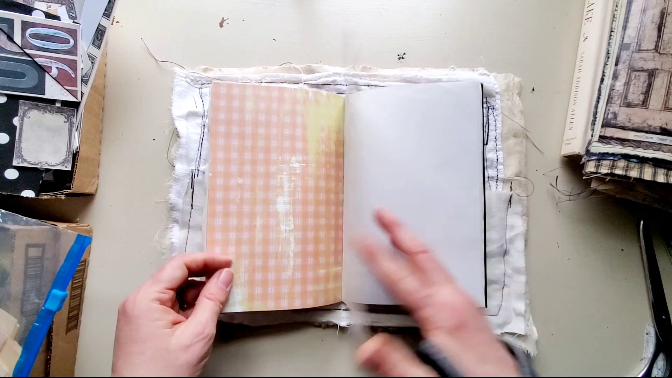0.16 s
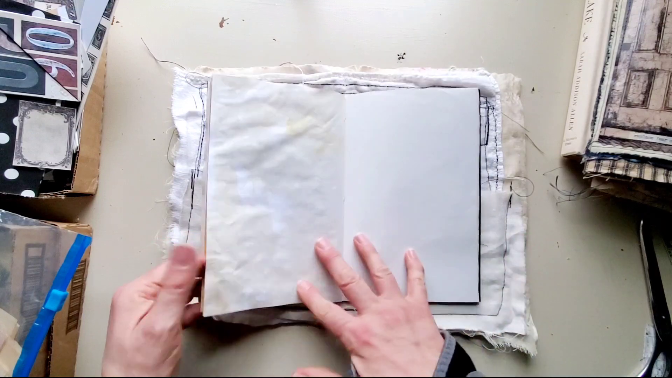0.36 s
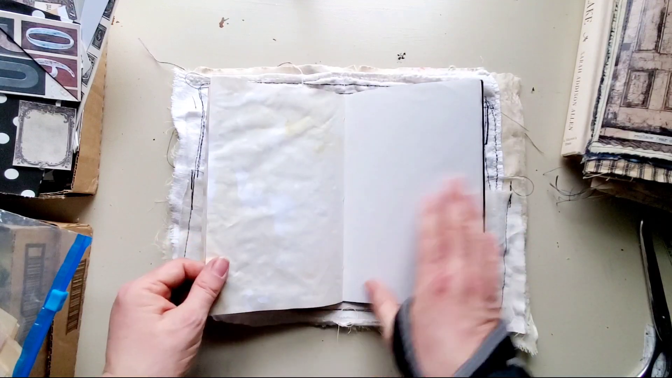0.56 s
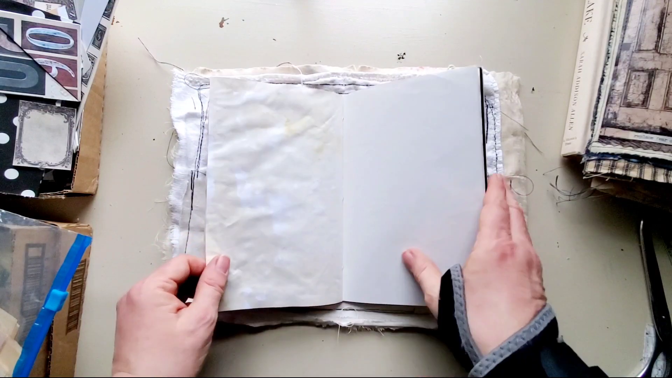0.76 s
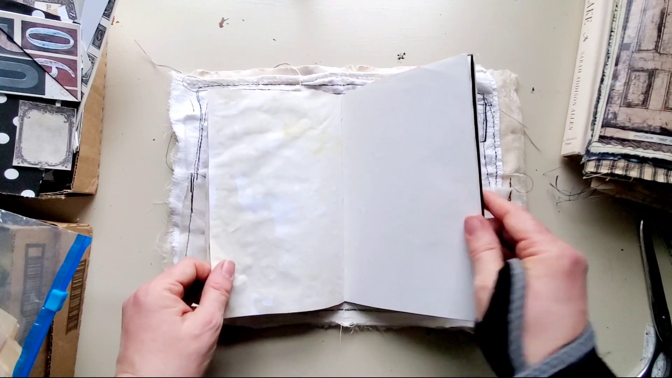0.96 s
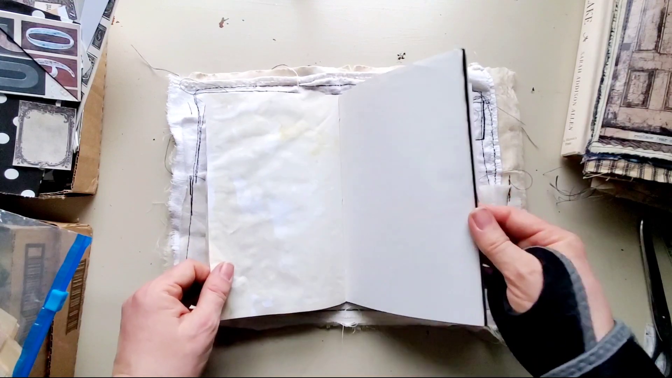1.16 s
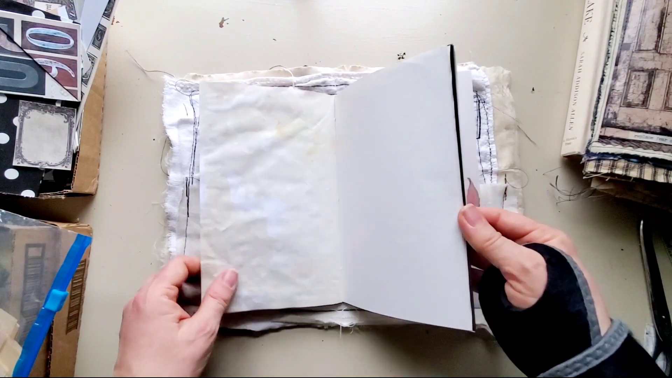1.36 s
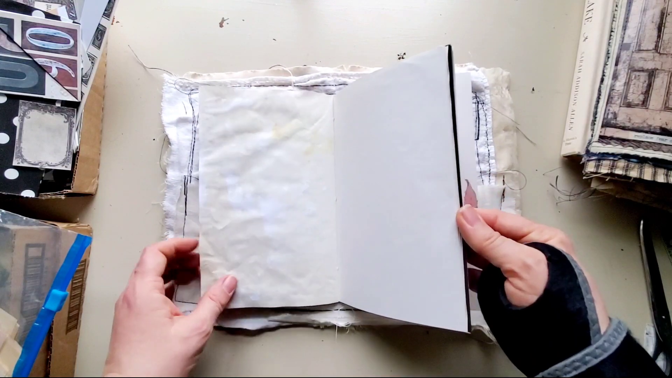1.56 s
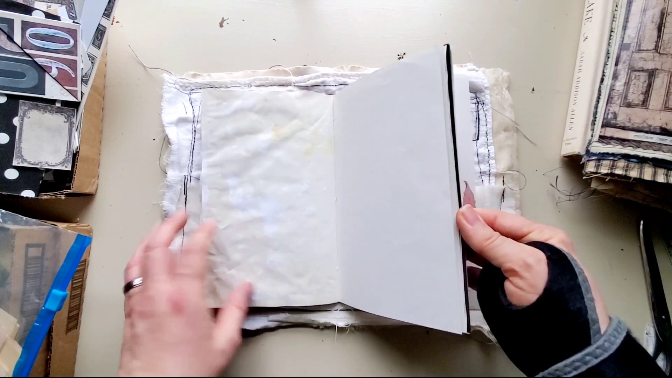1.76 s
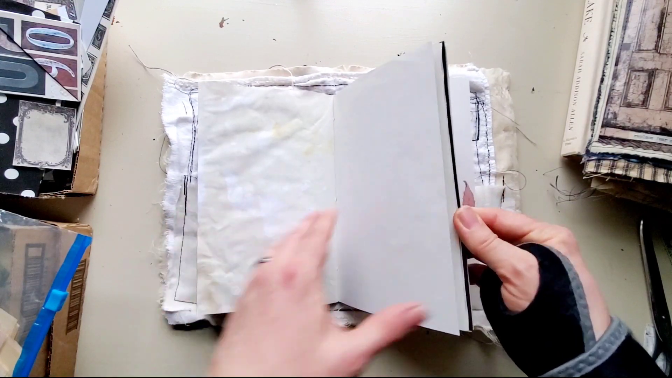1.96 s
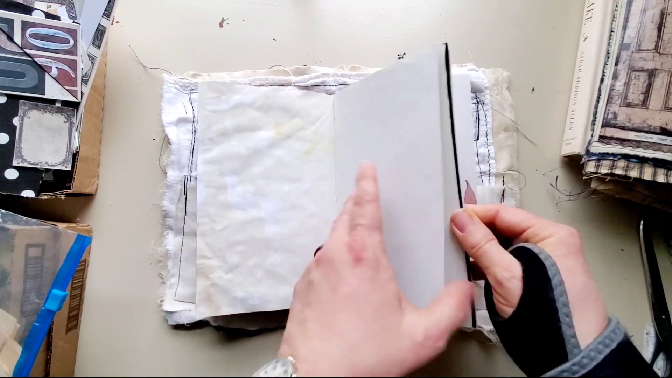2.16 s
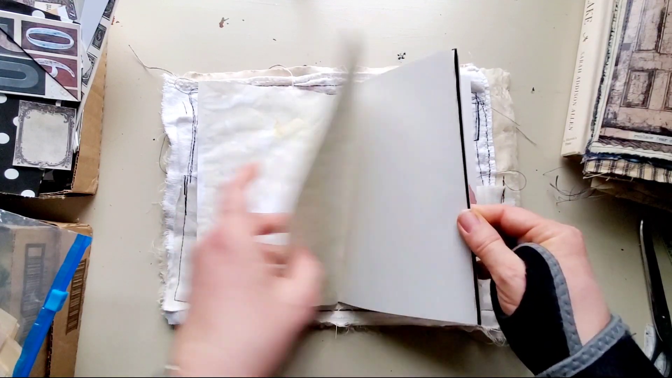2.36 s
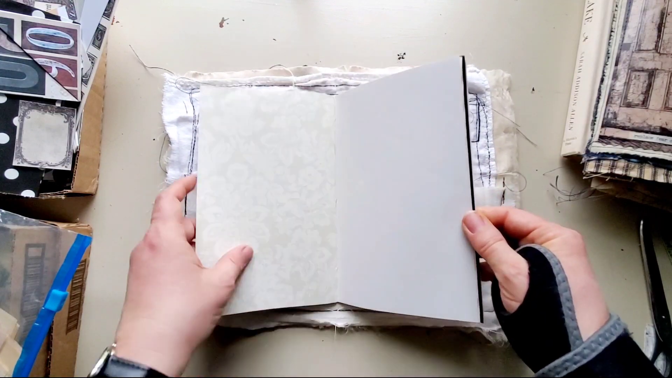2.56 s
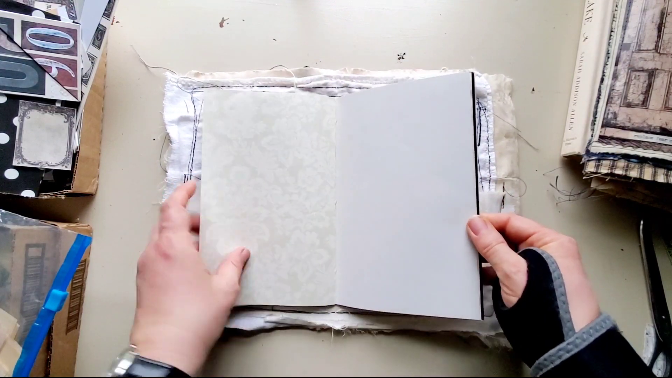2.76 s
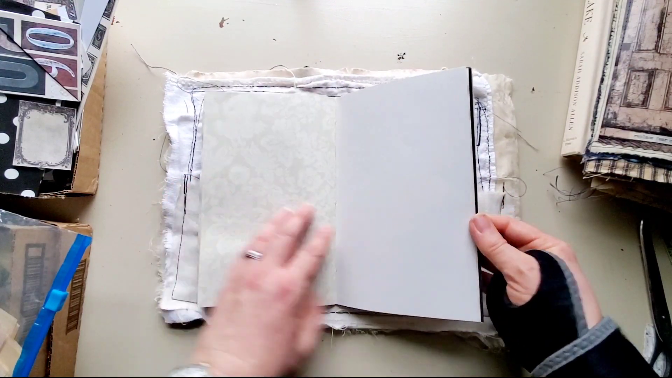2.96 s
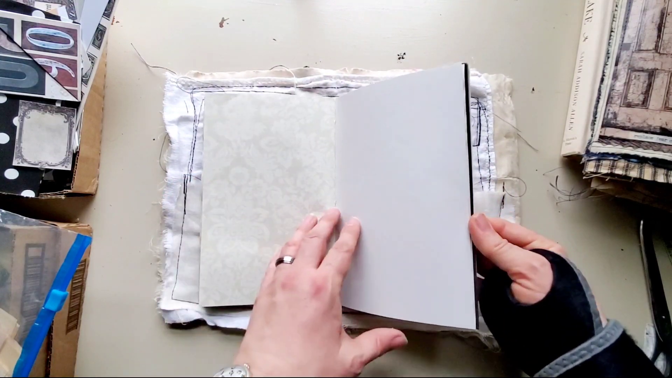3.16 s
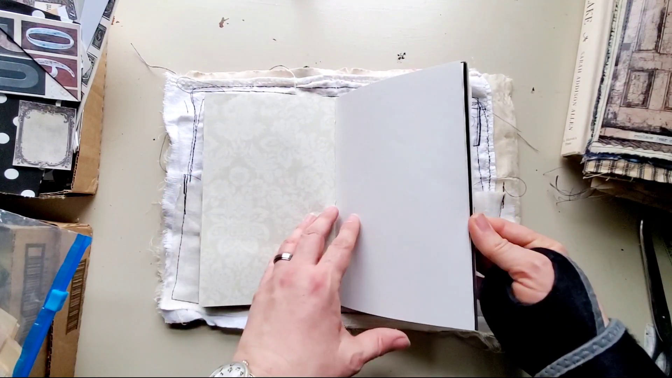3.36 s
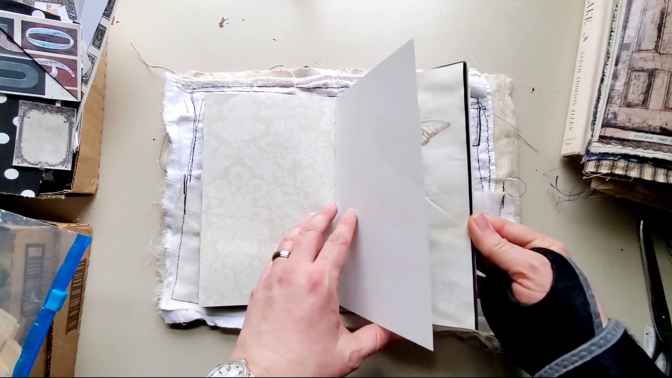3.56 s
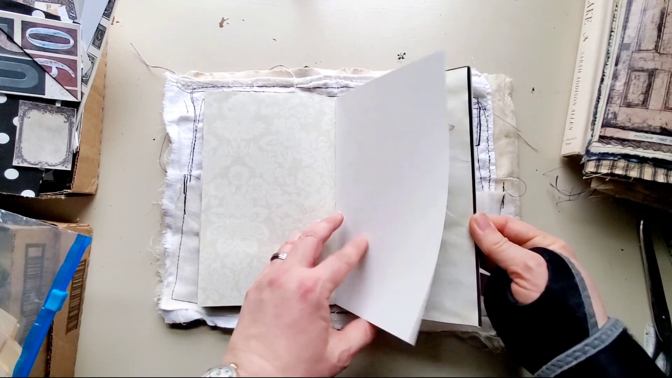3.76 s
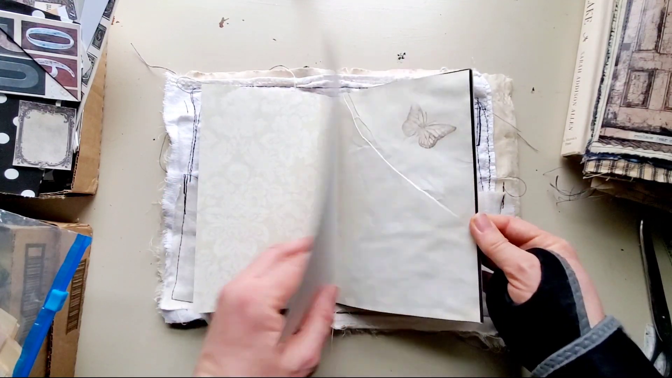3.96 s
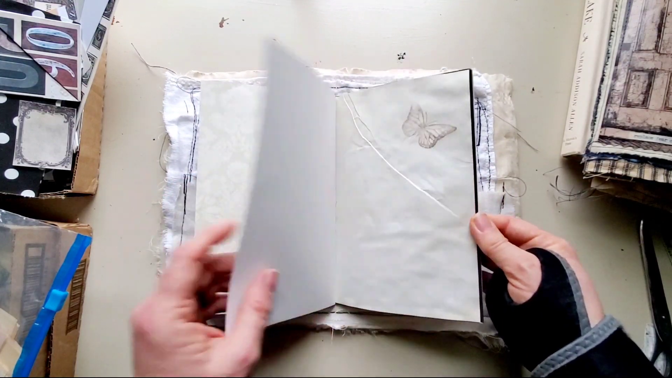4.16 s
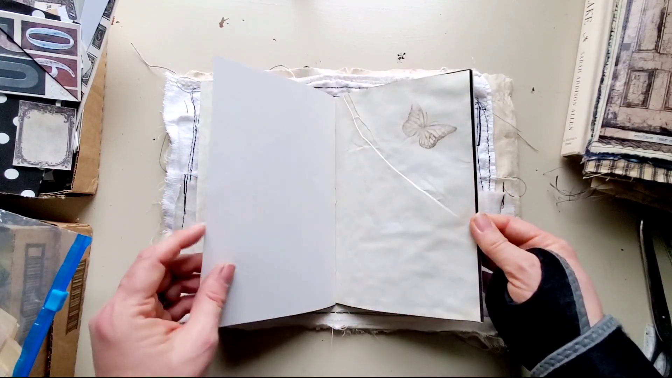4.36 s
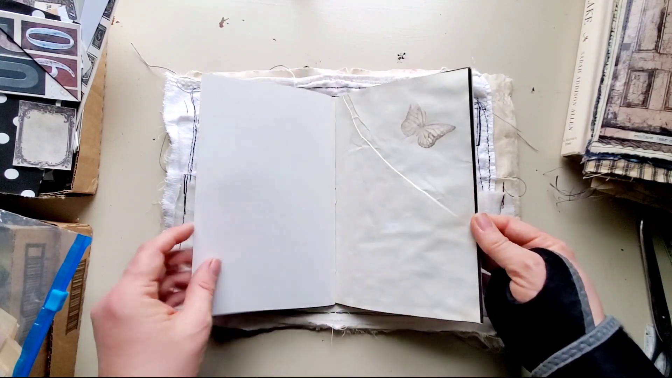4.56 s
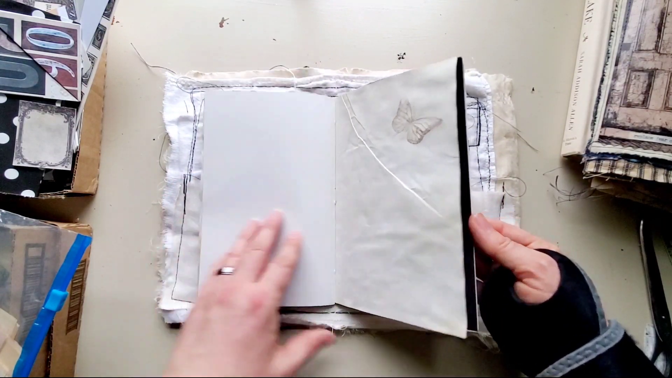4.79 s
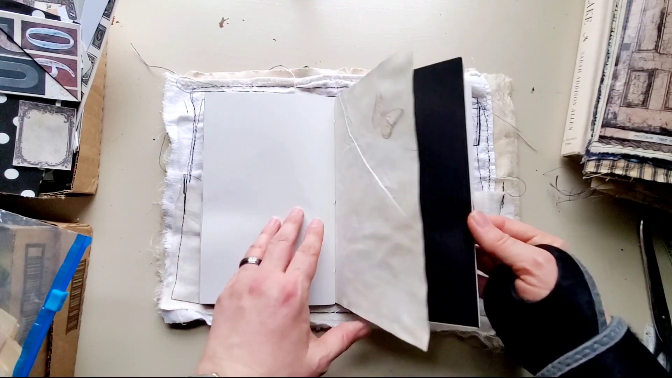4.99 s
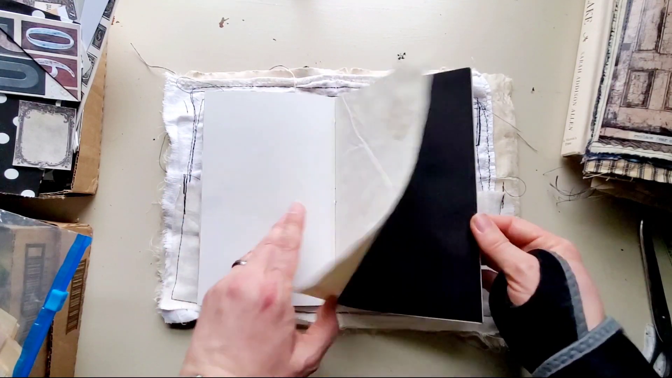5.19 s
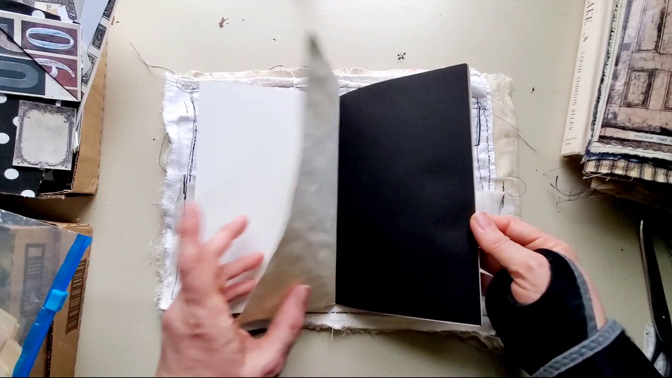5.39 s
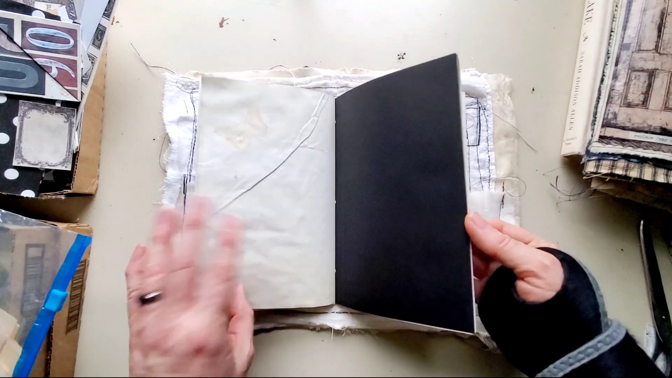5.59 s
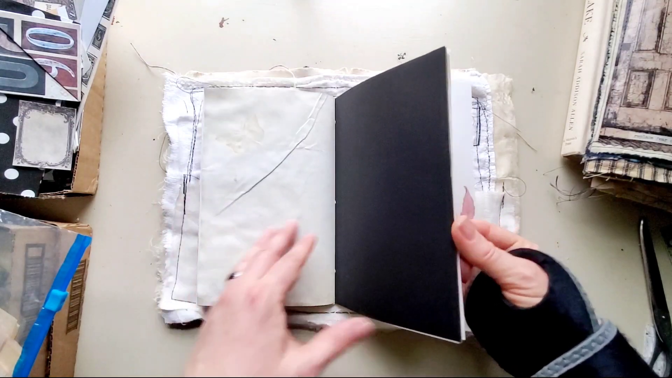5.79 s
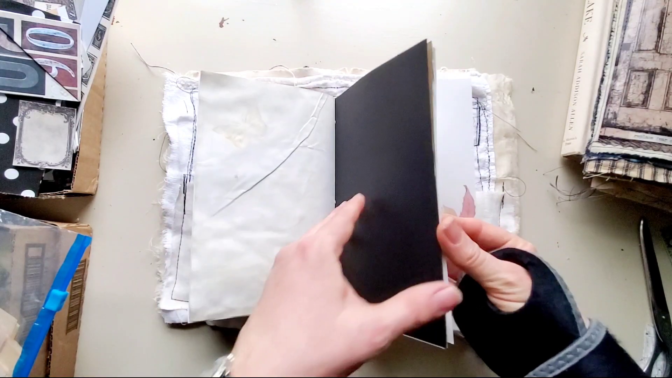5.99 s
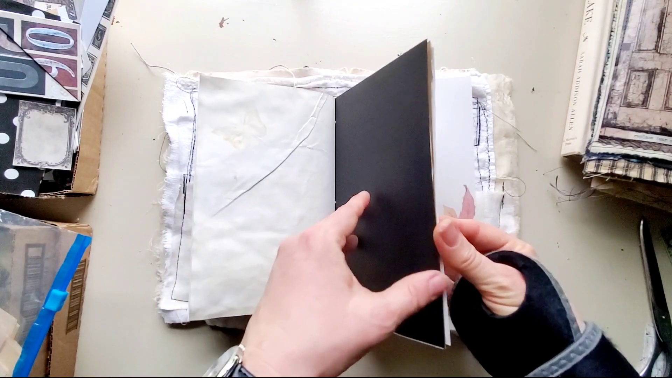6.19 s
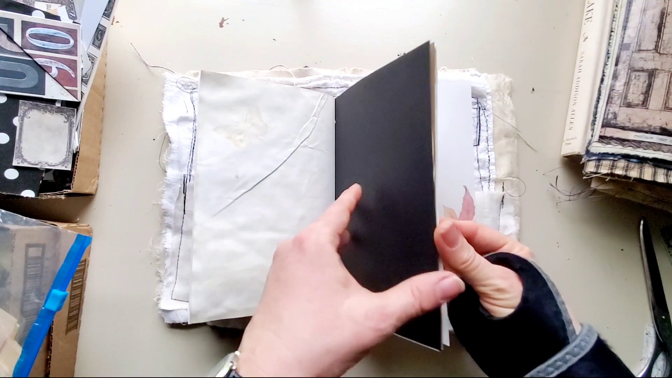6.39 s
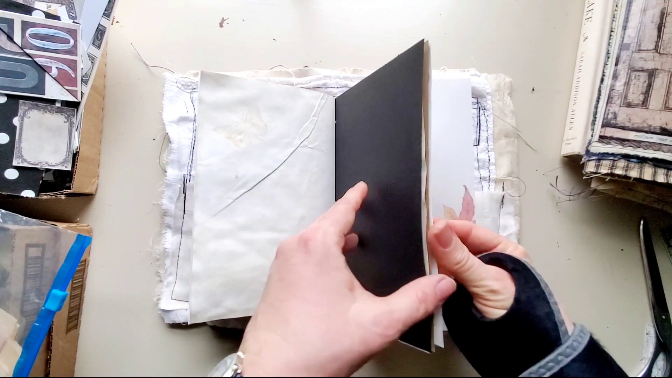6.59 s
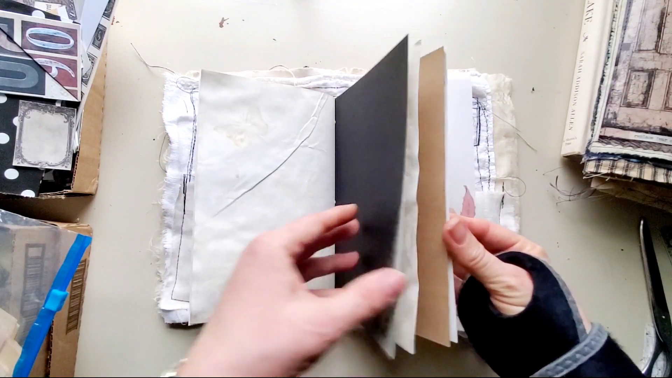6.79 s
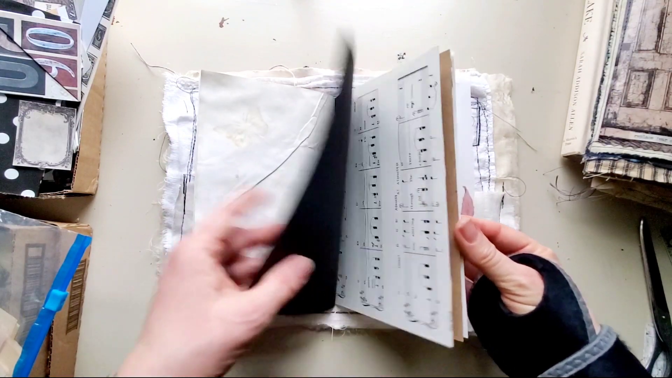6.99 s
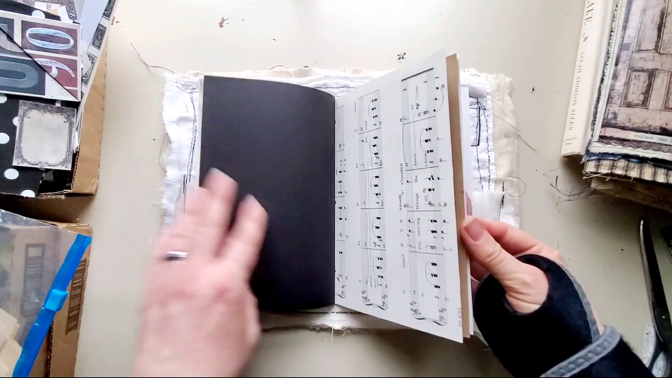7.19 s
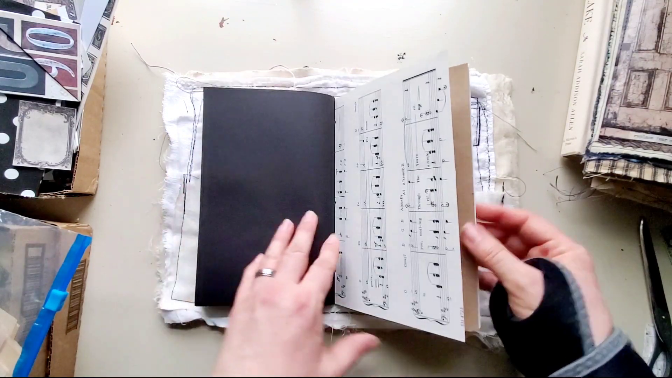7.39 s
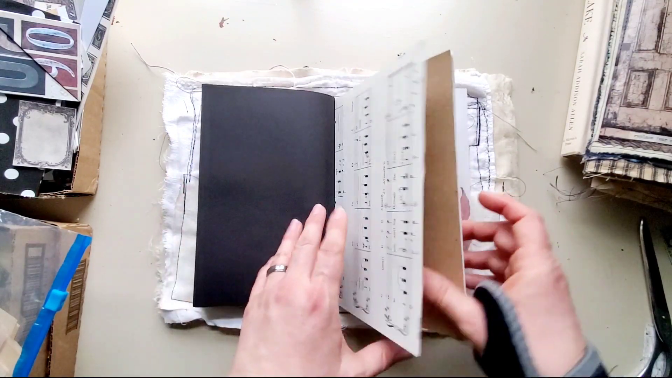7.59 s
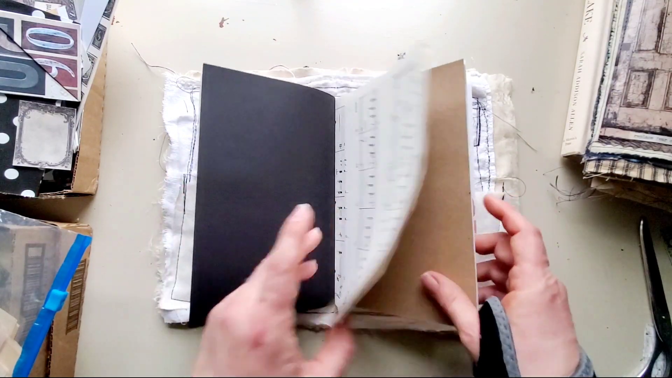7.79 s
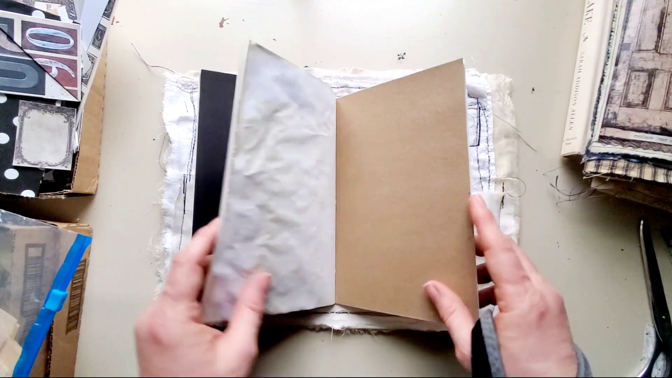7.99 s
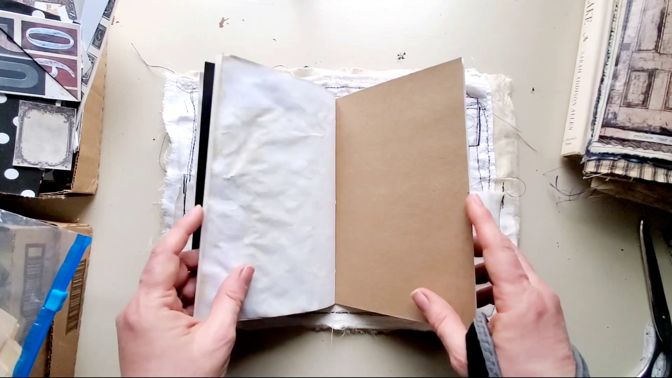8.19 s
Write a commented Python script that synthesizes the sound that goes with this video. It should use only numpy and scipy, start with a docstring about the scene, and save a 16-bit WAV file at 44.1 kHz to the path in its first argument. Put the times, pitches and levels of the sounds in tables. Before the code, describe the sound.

A close stereo pickup of paper pages being turned in a small, quiet room with a barely audible low mains hum. From 0.1 to 0.6 s a crinkly sheet rustles over with several light pops, then a palm brushes softly across it until about 1.1 s. After a lull, short scrapes come around 1.5-1.9 s, and a bright, sharp snap with a quick rustle at 2.6 s. Hissy brushes follow at 2.9-3.2 s, then near quiet. A smoother page slides over from 3.9 to 4.4 s, ending in a soft flick. Airy swishes at 4.7-4.9 s lead to crackling at 5.3 s and the strongest cluster of snaps at 5.6-5.8 s. A brief brush at 6.4 s breaks a quieter pause. Crisp flicks and rustling return at 7.0-7.4 s, followed by lighter slides and small snaps at 7.7-8.1 s.

```python
"""Sliding paper: skin and sheets of a handmade book rub together, and dense random slips give hiss and crinkle.
Stiff sheets buckle with snaps, short falling bending waves each followed by a rattle of filtered noise.
Narrow swishes are rustle through a gliding resonance; dull pushes of pages and air are swells of band noise.
Desk resonances colour the blows, a small quiet room adds reflections, and a faint mains hum lies under it all."""
import sys
import numpy as np
from scipy import signal
from scipy.fft import rfft, irfft, next_fast_len
from scipy.io import wavfile
from scipy.ndimage import uniform_filter1d

SR = 44100
rng = np.random.default_rng(int(sys.argv[2]) if len(sys.argv) > 2 else 0)


def transcribe(signal):
    """Save signal, clipped to [-1, 1], as a 16-bit WAV file at the path in sys.argv[1]."""
    frames = np.atleast_2d(signal).T
    limited = np.clip(frames, -1, 1)
    pcm = np.round(limited * 32767).astype(np.int16)
    wavfile.write(sys.argv[1], SR, pcm)


N = 363636
T = np.arange(N) / SR  # s

# Levels in the event tables are those at the source, ahead of the desk and room.
# Steady slides of a page or palm: [start t/s, rise t/s, length t/s, hiss level/dB, rustle level/dB,
# level change over the slide/dB]
GLIDES = [(0.189, 0.083, 0.27, -59, -54.5, 5), (0.536, 0.041, 0.069, -46.5, -50.5, -7),
          (0.731, 0.063, 0.062, -58.5, -55.5, 0), (0.832, 0.026, 0.3, -63.5, -65.5, 1),
          (1.454, 0.015, 0.096, -52, -50, 2), (2.044, 0.0039, 0.049, -61, -75, 5),
          (2.29, 0.058, 0.022, -65, -69.5, 5), (2.362, 0.0085, 0.11, -53, -46.5, -14.5),
          (2.526, 0.021, 0.058, -56, -46.5, 1), (2.904, .02, 0.031, -49, -47.5, 3),
          (3.029, 0.02, 0.057, -53, -48, -3.5), (3.132, 0.014, 0.12, -52, -55, -13.5),
          (3.949, 0.072, 0.031, -53.5, -50, -4), (4.039, 0.091, 0.38, -52.5, -53, -1.5),
          (4.702, .008, 0.087, -47, -46, -3), (4.865, .03, 0.23, -45, -49, -27.5),
          (5.283, 0.011, 0.056, -57, -41, -5), (5.42, 0.032, 0.16, -44, -41.5, -10.5),
          (5.664, 0.046, 0.06, -71.5, -45, 1.5), (5.816, 0.034, 0.19, -48.5, -51.5, -7),
          (6.38, 0.018, 0.062, -42, -47, -28), (6.659, 0.023, 0.16, -67, -72.5, -13),
          (6.866, 0.037, 0.063, -60.5, -62, 0), (7.053, .016, 0.095, -48, -47, -2.5),
          (7.17, 0.0076, 0.038, -43.5, -39, -1.5), (7.467, 0.017, 0.072, -55.5, -59, 2.5),
          (7.66, 0.067, 0.18, -59, -61.5, 4), (7.877, 0.02, 0.14, -53.5, -53.5, 3),
          (8.063, .02, 0.15, -59, -59.5, 3)]
# Quick brushes that speed up and slow again: [peak t/s, swell t/s, hiss level/dB, rustle level/dB]
BRUSHES = [(0.08, 0.0083, -60, -54), (.695, 0.042, -46.5, -80), (1.047, 0.021, -57, -53),
           (1.906, .02, -55, -77), (2.631, 0.0073, -42, -35), (1.682, 0.017, -55, -46),
           (3.085, 0.015, -39, -50.5), (4.829, 0.015, -40.5, -42.5), (5.82, 0.012, -38.5, -38.5),
           (7.287, 0.013, -68, -41), (7.388, 0.027, -36, -36.5), (7.991, 0.014, -42, -55)]
# Power spectrum of the fibre hiss: [f/Hz, relative level/dB per Hz]
FIBRES = [(300, -21), (600, -10), (1000, -22.5), (3000, -9.5), (6000, 3.5), (9500, 5), (15500, 5)]
# Power spectrum of the rustling sheet: [f/Hz, relative level/dB per Hz]
SHEET = [(280, -22), (500, -8), (640, -7.5), (900, -10.5), (1250, -5.5), (2200, -3), (3700, -1), (5200, -6),
         (9000, -16.5), (16000, -11.5)]
# Sheets that buckle, flick or land: [t/s, nominal level/dB (pops below STIFF_HZ are weaker), nominal f/Hz]
SNAPS = [(.149, -46, 1320), (.197, -41.5, 1390), (.409, -31, 1390), (.425, -37.5, 1487), (.453, -40, 1110),
         (.531, -41, 2430), (.571, -38.5, 1220), (.587, -38.5, 1210), (1.71, -44, 1220), (2.565, -38, 1570),
         (2.627, -27, 3600), (2.6355, -23.5, 1530), (2.641, -33, 630), (3.152, -42.5, 1720),
         (3.552, -47.5, 3970), (3.88, -53.5, 820), (4.295, -50, 1090), (4.394, -36, 1610),
         (4.399, -35, 610), (4.891, -46, 950), (5.281, -31.5, 1960), (5.292, -26, 2320), (5.315, -26, 1600),
         (5.618, -39, 1430), (5.622, -39, 670), (5.636, -24.5, 2430), (5.6675, -22.5, 3550),
         (5.684, -21, 2030), (5.825, -32.5, 2370), (6.388, -53, 950), (6.655, -60.5, 1105),
         (7.049, -43, 1106), (7.112, -35.5, 1400), (7.12, -32.5, 1240), (7.169, -35, 1370),
         (7.2, -28.5, 1450), (7.373, -32, 1610), (7.378, -31.5, 1100), (7.382, -28.5, 1880),
         (7.389, -44, 1830), (7.663, -38.5, 3000), (7.89, -41.5, 1005), (7.942, -32.5, 1570),
         (8.004, -34.5, 1176)]
# Narrow swishes of a sheet or fingertip: [peak t/s, level/dB, f/Hz at the peak, length t/s, glide/octaves per s]
SWISHES = [(1.47, -47.5, 3650, 0.056, -9), (1.208, -65.5, 2380, 0.16, -4), (4.646, -54, 2120, 0.089, 5),
           (4.795, -45, 2390, 0.11, 0), (6.363, -54.5, 2880, .14, .6), (6.866, -74, 1830, 0.09, -4),
           (7.348, -41.5, 4600, 0.05, -7)]
# Dull pushes of pages, air and palms: [peak t/s, level/dB, f/Hz, length t/s]
PUSHES = [(.445, -49, 294, 0.079), (.57, -51.5, 89, 0.089), (.72, -57, 84, 0.079), (.93, -69, 490, 0.6),
          (2.652, -47.5, 96, 0.064), (3.895, -55, 178, 0.042), (4.444, -57, 250, 0.042),
          (5.392, -52.5, 260, 0.039), (5.56, -58, 55, 0.37), (6.829, -62, 55.6, 0.28),
          (6.935, -68.5, 560, 0.054), (7.18, -49, 182, 0.067)]
# Resonances of the book and desk: [f/Hz, width f/Hz, lift level/dB]
BODY = [(647, 110, 7.5), (1790, 45, 5), (2360, 60, 4.5)]
# Reverberation time of the room: [f/Hz, time to fall by 60 dB t/s]
ROOM = [(150, 0.41), (600, 0.29), (2800, 0.34), (7300, 0.36), (15000, 0.25)]
# Left-right correlation of the microphone pair: [f/Hz, correlation from 0 to 1]
LIKENESS = [(100, 0.49), (600, 0.56), (2000, 0.25), (8000, .05)]
# Power spectrum of the quiet room: [f/Hz, relative level/dB per Hz]
QUIET = [(20, -25), (70, -9.5), (220, -15), (2200, -26), (7000, -26), (15500, -31)]

LET_GO_S, RISE_SHAPE = 0.013, 1.12  # decay time of a slide; exponent 1 is a pointed start, 2 a round one
SETTLE_DB, SETTLE_S = -11.5, 0.091  # the paper creeps on: level relative to the slide's end, decay time
BRUSH_SHAPE = 1.84  # exponent: 1 is a pointed swell, 2 a round one
RATTLE_S, STIFF_HZ = 0.014, 1700  # longest rattle decay; creases above STIFF_HZ die sooner
POP_CYCLES, POP_RISE_CYCLES = 2.8, 0.7  # decay and rise of a pop, in cycles of its nominal pitch
POP_SAG = 0.6  # fall of the pop's pitch, as a share of the nominal pitch
EDGE_HZ = 15950  # upper edge of the output band


def sliding(rumble_db=-21, rumble_hz=85, rumble_spread=2.5, grip_db=1.04, patchy_db=3.5):
    """Dry friction: slips too dense to tell apart make hiss, rustle and a low rumble of the page block."""
    crinkles = amp(-4) * grains(SHEET, per_s=500)  # tiny creases give way
    hiss_strength, rustle_strength = friction()
    grip = amp(grip_db * wander(rate_hz=79))  # the friction catches and lets go
    balance = amp(np.array([[1], [-1]]) * 1.0)  # hiss 1 dB up on the left, 1 dB down on the right
    hiss = flex(grains(FIBRES), patchy_db) * balance
    rustle = unit(flex(grains(SHEET), patchy_db) + crinkles)
    block = band(pair(rng.standard_normal((2, N))), rumble_hz, rumble_spread)
    block = unit(band(block, rumble_hz, rumble_spread))
    sheet = rustle + amp(rumble_db) * block
    return grip * (hiss * hiss_strength + sheet * rustle_strength)


def friction():
    """Incoherent addition: the powers of all glides and brushes sum, for hiss and rustle separately."""
    strokes = []
    for start, rise_s, length, hiss_db, rustle_db, change_db in GLIDES:
        strokes.append((glide(start, rise_s, length, change_db), hiss_db, rustle_db))
    for peak, swell_s, hiss_db, rustle_db in BRUSHES:
        strokes.append((brush(peak, swell_s), hiss_db, rustle_db))
    powers = (np.outer(amp([hiss, rustle]) ** 2, shape ** 2) for shape, hiss, rustle in strokes)
    return np.sqrt(sum(powers))


def glide(start, rise_s, length, change_db):
    """Sustained excitation: a slide takes hold, runs on as its pressure changes, lets go and settles."""
    before = np.maximum(start - T, 0)
    after = np.maximum(T - start - length, 0)
    rise = np.exp(-(before / rise_s) ** RISE_SHAPE)
    pressure = amp(change_db * np.clip((T - start) / length, 0, 1))
    creep = amp(SETTLE_DB) * np.exp(-after / SETTLE_S)
    release = np.maximum(np.exp(-after / LET_GO_S), creep)
    return rise * pressure * release


def brush(peak, swell_s):
    """Speed-dependent friction: a brush swells and fades evenly about its fastest moment."""
    return np.exp(-(abs(T - peak) / swell_s) ** BRUSH_SHAPE / 2)


def grains(spectrum, per_s=9000):
    """Stick-slip: random clicks, per_s a second on average, make a shaped crackle of rms 1."""
    size = amp(2 * np.minimum(rng.exponential(1, (2, N)), 3))  # 0 to 6 dB
    slips = rng.random((2, N)) < per_s / SR
    clicks = rng.choice([-1., 1.], (2, N)) * size * slips
    return unit(colour(pair(clicks), lambda f: amp(read(spectrum, f))))


def flex(x, patchy_db):
    """Varying radiation: bending recolours a sheet in patches near 400 Hz by 30 ms, less in the treble."""
    hz, _, z = signal.stft(x, SR, nperseg=512)
    patches = rng.standard_normal(z.shape[1:])
    patches = uniform_filter1d(patches, size=5, axis=0)  # over frequency
    patches = unit(uniform_filter1d(patches, size=5, axis=1))  # over time
    depth_db = patchy_db / np.sqrt(1 + hz[:, None] / 4000)
    return unit(signal.istft(z * amp(depth_db * patches))[1][:, :N])


def snaps(spread=1.66, rattle=0.43, crack=0.1, tick=0.18, thud=0.15):
    """Buckling: each sheet flips with one sharp pop, then its wrinkles rattle and die away."""
    out, t = np.zeros((2, N)), np.arange(SR // 8) / SR
    for s, db, hz in SNAPS:
        rattle_s = RATTLE_S * min(STIFF_HZ / hz, 1)
        chance = pair(rng.standard_normal((2, len(t))))
        # small, stiff creases also tick, for half as long as they pop
        split = tick * hz / STIFF_HZ * chance * np.exp(-t * hz / POP_CYCLES * 2)
        wrinkles = band(chance, hz, spread)
        wrinkles = unit(band(wrinkles, hz, spread) + crack * wrinkles)
        pad = band(rng.standard_normal(len(t)), 490, 1.6)  # the pages below answer dully
        pad = unit(band(pad, 710, 7.4))
        envelope = np.exp(-t / rattle_s) * (1 - np.exp(-10 * t / rattle_s))
        tail = (rattle * wrinkles + thud * pad) * envelope
        snap = pop(hz, t) * np.sqrt(min(hz / STIFF_HZ, 1))  # a limp landing pops less
        add(out, s, amp(db) * (snap + split + tail))
    return out


def pop(hz, t):
    """Dispersion of bending waves: the pitch falls over a few cycles, under a shorter overtone."""
    overtone, overtone_db = 2.1, -7  # frequency ratio, relative level
    fade = np.exp(-t * hz / POP_CYCLES)
    swell = (1 - np.exp(-t * hz / POP_RISE_CYCLES)) * fade
    phase = 2 * np.pi * np.cumsum(hz * (1 + POP_SAG * (fade - .5))) / SR
    skew = rng.uniform(-1, 1, (2, 1))  # each microphone catches the wave at another point
    fundamental = np.sin(phase + skew)
    upper = amp(overtone_db) * np.sqrt(fade) * np.sin(overtone * phase + 2 * skew)
    return swell / swell.max() * (fundamental + upper)


def swishes():
    """Resonance: rustle excites one mode of the sheet, which glides as the free length of paper changes."""
    width = .18  # of the resonance, as a share of its pitch
    out, rustle = np.zeros((2, N)), grains(SHEET)
    for s, db, hz, length, octaves_per_s in SWISHES:
        swell = np.hanning(int(2 * length * SR)) ** 2
        t = np.arange(len(swell)) / SR - length  # zero at the peak
        turn = np.exp(2j * np.pi * np.cumsum(hz * 2 ** (octaves_per_s * t)) / SR)
        slips = rustle[:, round(s * SR):][:, :len(t)]
        # shift the gliding pitch to zero, filter there, then shift back
        pole = np.exp(-np.pi * width * hz / SR)
        ring = signal.lfilter([1], [1, -pole], slips / turn)
        add(out, s - length, amp(db) * swell * unit((ring * turn).real))
    return out


def pushes(spread=1.65):
    """Displaced air and soft impact: smooth swells of noise, each in one broad resonance."""
    out = np.zeros((2, N))
    for s, db, hz, length in PUSHES:
        air = band(pair(rng.standard_normal((2, 2 * SR))), hz, spread)
        air = unit(band(air, hz, spread))
        swell = np.hanning(int(min(2 * length, 1.5) * SR)) ** 2
        add(out, s - len(swell) / SR / 2, amp(db) * swell * air[:, -len(swell):])
    return out


def desk(x):
    """Modal response: the book and desk ring briefly at their own resonances, added to the direct sound."""
    out = x.copy()
    for hz, width, db in BODY:
        b, a = signal.iirpeak(hz, hz / width, SR)
        out += (amp(db) - 1) * signal.lfilter(b, a, x)
    return out


def room(x, early_db=-9, tail_db=-11, early_s=0.0034):
    """Reflection and reverberation: close surfaces scatter the sound, then a short tail decays by band."""
    t = np.arange(SR // 2) / SR
    shape = (2, len(t))
    taps = rng.choice([-1., 1.], shape) * (rng.random(shape) < 4000 / SR)  # 4000 echoes a second on average
    early = pair(taps * (t > .0015) * np.exp(-t / early_s))
    hz, at, z = signal.stft(rng.standard_normal(shape) * (t > .006), SR, nperseg=256)
    decay = amp(-60 * at / read(ROOM, hz)[:, None])
    tail = pair(signal.istft(z * decay, SR, nperseg=256)[1][:, :len(t)])
    response = (amp(early_db) * unit(early) + amp(tail_db) * unit(tail)) / np.sqrt(len(t))
    return x + signal.fftconvolve(x, response, axes=1)[:, :N]


def background(hum_db=-73, drone_db=-73, quiet_db=-77):
    """Interference: a steady mains hum beats against a narrow-band drone in faint room noise."""
    hum_hz = 59.3
    hum = np.sqrt(2) * np.sin(2 * np.pi * hum_hz * T)
    drone = band(pair(rng.standard_normal((2, N))), hum_hz, 1.15)
    drone = unit(band(drone, hum_hz, 1.15))
    return amp(hum_db) * hum + amp(drone_db) * drone + amp(quiet_db) * noise(QUIET)


def noise(spectrum):
    """Random noise: rms 1 with the given power spectrum, as the microphone pair hears it."""
    return unit(colour(pair(rng.standard_normal((2, N))), lambda f: amp(read(spectrum, f))))


def pair(x):
    """Spatial correlation: two unrelated signals become a pair, more alike in the bass than in the treble."""
    def likeness(f):
        return np.clip(read(LIKENESS, f), -1, 1)
    mid = colour(x[0], lambda f: np.sqrt((1 + likeness(f)) / 2))
    side = colour(x[1], lambda f: np.sqrt((1 - likeness(f)) / 2))
    return np.array([mid + side, mid - side])


def wander(rate_hz):
    """Slow random fluctuation: low-passed noise of rms 1."""
    return unit(colour(rng.standard_normal(N), lambda f: np.exp(-(f / rate_hz) ** 2)))


def band(x, hz, spread):
    """Band-pass resonance: a broad passband from hz / spread to hz * spread."""
    spread = max(spread, 1.05)
    edges = [hz / spread, min(hz * spread, .45 * SR)]
    return signal.sosfilt(signal.butter(1, edges, "band", fs=SR, output="sos"), x)


def colour(x, gain):
    """Linear filtering: multiplies the spectrum of x by a gain given as a function of frequency."""
    size = next_fast_len(x.shape[-1] + 2048)
    spectrum = rfft(x, size) * gain(np.fft.rfftfreq(size, 1 / SR))
    return irfft(spectrum, size)[..., :x.shape[-1]]


def read(points, hz):
    """Logarithmic frequency scale: interpolates a table of values over log frequency."""
    f, value = np.transpose(points)
    return np.interp(np.log(hz + 1), np.log(f), value)


def amp(db):
    """Decibel law: converts a level to an amplitude gain."""
    return 10 ** (np.asarray(db) / 20)


def unit(x):
    """Normalisation: scales to an rms of 1."""
    return x / np.sqrt(np.mean(x ** 2) + 1e-20)


def add(mix, s, sound):
    """Superposition: adds a sound to the mix at s seconds."""
    part = mix[..., max(round(s * SR), 0):][..., :sound.shape[-1]]
    part += sound[..., :part.shape[-1]]


def scene():
    """Superposition: sliding, snapping and swishing paper sound in the room, over the background."""
    blows = desk(snaps() + pushes())  # only blows reach the desk
    return room(sliding() + blows + swishes()) + background()


def record(dry):
    """Band limitation: a linear-phase low-pass removes what lies above EDGE_HZ."""
    low_pass = signal.firwin(511, EDGE_HZ, window=("kaiser", 9), fs=SR)
    return signal.oaconvolve(dry, low_pass[None], "same")


dry = scene()
out = record(dry)
transcribe(out)
```